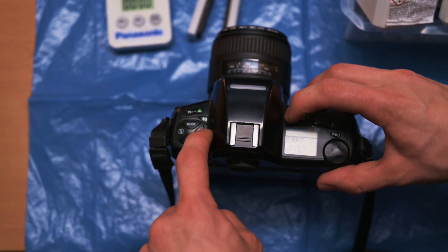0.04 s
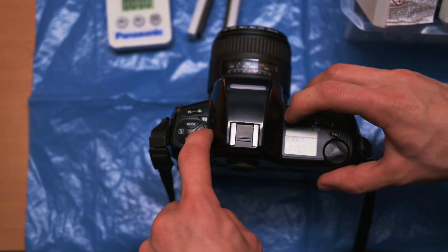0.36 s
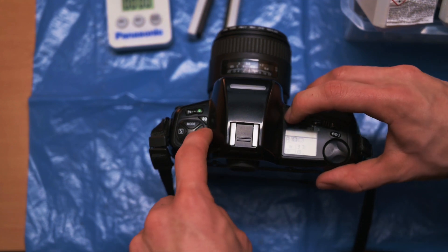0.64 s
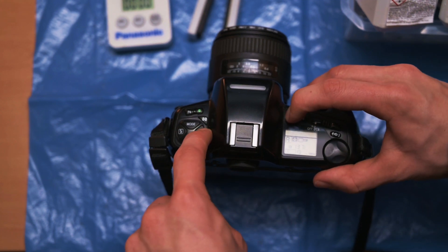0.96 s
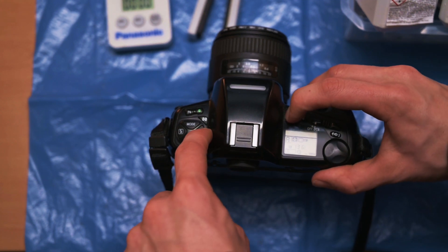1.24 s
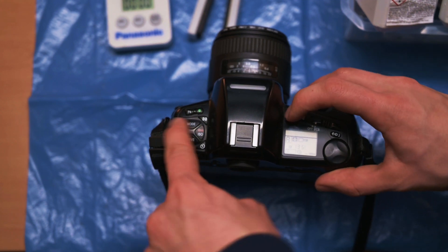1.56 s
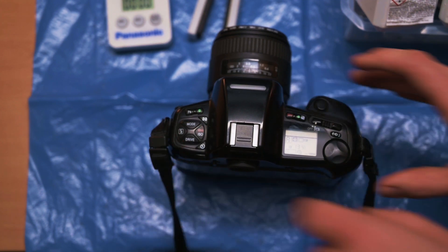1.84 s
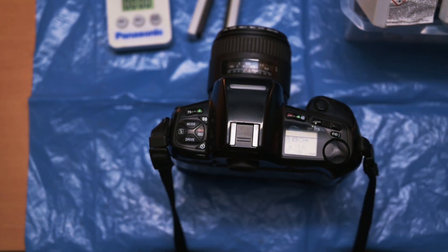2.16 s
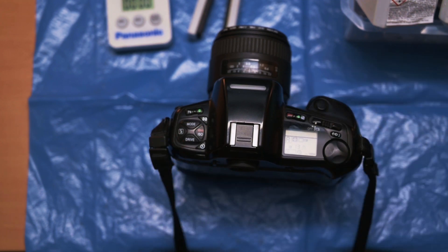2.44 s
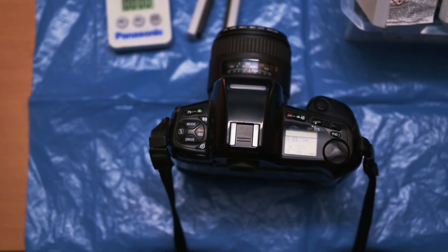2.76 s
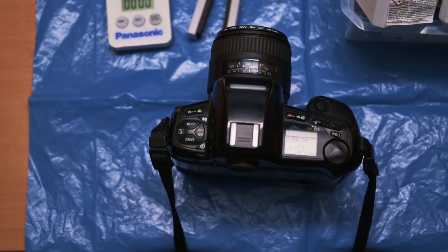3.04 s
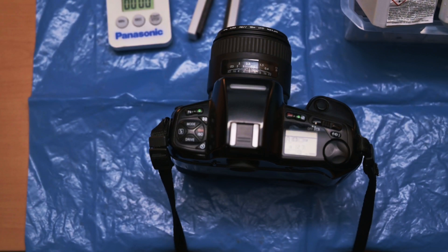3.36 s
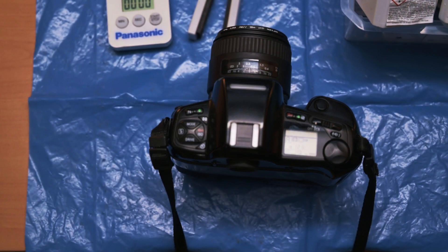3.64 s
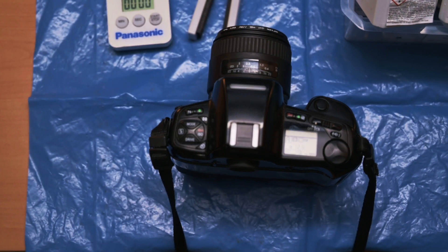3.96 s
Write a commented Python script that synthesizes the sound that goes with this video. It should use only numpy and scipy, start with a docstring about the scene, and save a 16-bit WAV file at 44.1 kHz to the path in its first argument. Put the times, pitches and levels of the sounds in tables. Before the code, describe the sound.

A small camera motor whirs steadily, rewinding film after a sharp button click.

```python
"""A quiet room, where a film camera on a table rewinds its film. A finger presses the button, the drive
clicks in, and a small motor runs at about 193 turns a second. Its pinion whines against a wheel; the
teeth rattle through the plastic body and now and then catch with a tick. The film hisses thinly as it
starts to move."""
import sys
import numpy as np
from scipy import signal
from scipy.fft import rfft, irfft, next_fast_len
from scipy.io import wavfile
from scipy.ndimage import map_coordinates

SR = 44100
rng = np.random.default_rng(int(sys.argv[2]) if len(sys.argv) > 2 else 0)


def wrap_up_sound(samples):
    """Save the sound to the file named by the first command line argument, as 16-bit audio."""
    columns = np.atleast_2d(samples).T
    # keep every value between -1 and 1, then stretch to whole-number steps
    tamed = np.clip(columns, -1, 1)
    steps = np.round(tamed * 32767).astype(np.int16)
    wavfile.write(sys.argv[1], SR, steps)


N = 176400
PINION_TEETH, WHEEL_TEETH = 16, 35


def amp(db):
    return 10 ** (np.asarray(db) / 20)


def unit(x):
    """Scale to rms 1."""
    return x / np.sqrt(np.mean(x ** 2) + 1e-20)


def curve(rows):
    """An automation line through (t/s, value) points."""
    return np.interp(np.arange(N) / SR, *np.transpose(rows))


def wobble(rate):
    """A smooth random curve, rate knots a second."""
    return map_coordinates(rng.standard_normal(N // 20), [np.arange(N) * rate / SR], mode="wrap")


def coloured(x, points):
    """Minimum-phase EQ of unit energy through (f/Hz, level/dB) points."""
    size = 2 * next_fast_len(N // 2 + SR // 10)
    hz, db = np.transpose(points)
    gain = amp(np.interp(np.log(np.fft.rfftfreq(size, 1 / SR) + 1), np.log(hz), db))
    cepstrum = irfft(np.log(unit(gain)))
    cepstrum[1:size // 2] *= 2
    cepstrum[size // 2 + 1:] = 0
    return irfft(rfft(x, size) * np.exp(rfft(cepstrum)), size)[:N]


def bursts(rows, decay_s):
    """A fast-dying burst of tiny contacts for each (t/s, level/dB) cue."""
    t = np.arange(N) / SR
    level = sum(amp(db) * (t >= s) * np.exp(-np.abs(t - s) / decay_s) for s, db in rows)
    return level * rng.standard_normal(N)


def partial(cycles, waver_db, waver_hz, drift_rad):
    """A sine of rms 1 whose level and phase waver."""
    phase = 2 * np.pi * (cycles + rng.random()) + drift_rad * wobble(waver_hz)
    return unit(np.sin(phase) * amp(waver_db * wobble(waver_hz)))


# Dark EQ of the room tone: f/Hz, level/dB
ROOM_EQ = [(15, -70), (25, -47), (82, -13.5), (140, -13.5), (188, -8.5), (246, -7), (340, -14), (703, -13),
           (1340, -19), (1660, -18.5), (2060, -24), (2230, -22.5), (2700, -26.5), (15500, -35.5)]
def room_tone(level_db=-55):
    """A quiet, steady rush under everything."""
    return amp(level_db) * coloured(rng.standard_normal(N), ROOM_EQ)


def reflections(x, wet_db=-9, t60_s=0.16):
    """The table and nearby things add a short tail to the direct sound."""
    t = np.arange(SR // 4) / SR
    tail = rng.standard_normal(len(t)) * amp(-60 * t / t60_s)
    return x + amp(wet_db) * signal.fftconvolve(x, tail / np.linalg.norm(tail))[:N]


# Swell and fade of the film hiss: t/s, level/dB
HISS_LEVEL = [(.94, -55), (1.25, -42), (1.42, -50), (1.5, -58), (2, -68)]
# Its airy peaks: f/Hz, level/dB
HISS_EQ = [(100, -50), (6000, -35), (7300, -20), (7750, 9), (8400, -23), (9900, -6), (11000, -22),
           (12750, -21), (13300, -13), (14100, 0), (14900, -14), (15600, -4)]
def film_hiss():
    """A thin hiss as the film starts to move."""
    return amp(curve(HISS_LEVEL)) * coloured(rng.standard_normal(N), HISS_EQ)


# The finger shifts on the body: t/s, level/dB
TOUCHES = [(.53, -56), (.787, -58)]
# The drive engages: t/s, level/dB
CLICKS = [(.9335, -38), (.9352, -44), (.9394, -23.5), (.9412, -27)]
# Crisp EQ of both: f/Hz, level/dB
BUTTON_EQ = [(100, -28), (1500, -14), (3000, -3), (4200, -4), (5500, -11), (8000, -9), (11000, -18),
             (15000, -15)]
def button():
    """Faint touches of the finger, then the click of the drive engaging."""
    return coloured(bursts(TOUCHES, decay_s=0.008) + bursts(CLICKS, decay_s=0.0027), BUTTON_EQ)


# Cues where the teeth catch: t/s, level/dB
TICKS = [(1.066, -25), (1.236, -38), (1.294, -22), (1.370, -22), (1.682, -22.5), (1.983, -25), (2.150, -24),
         (2.2245, -19.5), (2.385, -22), (2.70, -27), (3.003, -22), (3.324, -23), (3.646, -33), (3.737, -23),
         (3.785, -25), (3.944, -25)]
# Bright snap of a tick: f/Hz, level/dB
TICK_EQ = [(100, -46), (1500, -7.5), (3000, -3), (4200, 7.5), (5000, -12.5), (8500, -10), (10500, -16.5),
           (12000, -15), (15500, -29)]
def tooth_ticks():
    """Now and then the teeth catch with a sharp tick."""
    return coloured(bursts(TICKS, decay_s=0.0025), TICK_EQ)


# Rings of the casing: f/Hz, level/dB relative to the direct sound
CASE_MODES = [(786, 5), (1421, 3.5), (1558, 3.5), (1770, -12), (1910, -1), (2285, -6), (2770, -4),
              (2865, -7), (2968, -28), (3538, -12), (4129, -10)]
def casing(x, width_hz=18):
    """Narrow resonances ring on after whatever shakes the body."""
    f = np.fft.rfftfreq(2 * N, 1 / SR)
    ring = sum(amp(db) * f * width_hz / (hz * hz - f * f + 1j * f * width_hz) for hz, db in CASE_MODES)
    return irfft(rfft(x, 2 * N) * (1 + 1j * ring))[:N]


# Fader ride of the hum, before trim: t/s, level/dB
HUM_LEVEL = [(0.95, -56.5), (1.05, -51.5), (1.97, -47.5), (2.19, -48), (3.57, -47), (3.67, -59),
             (3.71, -45.5), (4.0, -50.5)]
def shaft_hum(motor, trim_db=0.5):
    """The shaft hums at one cycle per turn."""
    return amp(curve(HUM_LEVEL) + trim_db) * partial(motor, waver_db=0.6, waver_hz=8.2, drift_rad=0.03)


# Overtones of the motor's turn: harmonic number, level/dB
MOTOR_PARTIALS = [(4, -60), (8, -61.5), (9, -65), (13, -55.5), (17, -56), (20, -50), (21, -48.5), (31, -58),
                  (33, -53), (40, -59), (60, -59)]
# Overtones of the wheel's turn: harmonic number, level/dB
WHEEL_PARTIALS = [(16, -59.5), (43, -49.5), (44, -49), (47, -47.5), (48, -48), (49, -51), (68, -56),
                  (69, -45.5), (96, -52)]
def uneven_teeth(motor, wheel):
    """Uneven teeth add weak partials that swell as they cross the casing's rings."""
    tones = sum(amp(db) * partial(harmonic * shaft, waver_db=2.5, waver_hz=25, drift_rad=0.27)
                for shaft, rows in ((motor, MOTOR_PARTIALS), (wheel, WHEEL_PARTIALS))
                for harmonic, db in rows)
    return casing(tones)


# Plastic colour of the camera body: f/Hz, level/dB
BODY_EQ = [(50, -39), (150, -27.5), (290, -25), (380, -12.5), (600, -22), (1000, -16), (1480, -12.5),
           (1750, -15.5), (2350, -10), (2550, -14), (2950, -7.5), (3250, -5.5), (3550, -12), (3850, -5.5),
           (4260, -3), (4600, -17), (5300, -14), (5800, -15.5), (6200, -15), (6700, -16.5), (7800, -18.5),
           (8500, -16.5), (9000, -26), (10000, -26), (10800, -30.5), (11650, -19.5), (12400, -21.5),
           (13300, -26.5), (15700, -28.5)]
def gear_rattle(motor, wheel, strike_db=-34, scrape_db=-37, scatter_db=5, jitter_s=0.00015):
    """Each tooth strikes with its own force over a sliding scrape; both ring the body."""
    contacts = np.flatnonzero(np.diff(np.floor(PINION_TEETH * motor)))
    size, late, side = rng.standard_normal((N // 10, 3))[:len(contacts)].T
    onsets = np.clip(contacts + late * jitter_s * SR, 0, N - 1).astype(int)
    force = amp(scatter_db * np.minimum(size, 2.3))
    strikes = unit(np.bincount(onsets, force * np.sign(side), N))
    grit = amp(strike_db) * strikes + amp(scrape_db) * rng.standard_normal(N)
    # The load swells slightly with each gear's turn and surges at random.
    load_db = -0.05 * np.sin(2 * np.pi * motor) + 0.36 * np.sin(2 * np.pi * wheel) + 0.68 * wobble(110)
    return casing(coloured(grit * amp(load_db), BODY_EQ))


# Fader ride of the mesh tone, before trim and sway: t/s, level/dB
MESH_LEVEL = [(0.95, -39), (0.97, -36.5), (1.11, -32.5), (1.16, -39.5), (1.22, -30), (1.31, -45.5),
              (1.35, -33), (1.38, -53), (1.41, -35), (1.46, -48), (1.5, -34), (1.55, -46), (1.58, -38),
              (2.21, -36.5), (2.33, -39.5), (2.38, -33), (2.46, -41.5), (2.51, -38.5), (3.82, -35.5),
              (3.9, -43.5), (3.97, -35.5), (4.0, -37)]
# Fader ride of its octave: t/s, level/dB
OCTAVE_LEVEL = [(0.95, -61), (1.07, -39), (1.59, -40.5), (2.16, -36.5), (2.35, -42), (2.39, -35),
                (2.44, -38), (3.57, -37), (3.63, -44), (3.68, -36.5), (3.99, -37.5), (4.0, -40)]
def gear_whine(motor, wheel, trim_db=0.5, top_db=-55):
    """Meshing teeth sing a tone that sways with both gears, topped by two rougher octaves."""
    teeth = PINION_TEETH * motor
    sway = 1 + 0.18 * np.sin(2 * np.pi * wheel) + 0.2 * np.sin(2 * np.pi * motor)
    mesh = partial(teeth, waver_db=1.3, waver_hz=46, drift_rad=0.17) * sway
    octave = partial(2 * teeth, waver_db=1.8, waver_hz=110, drift_rad=0.38)
    top = partial(4 * teeth, waver_db=6.5, waver_hz=290, drift_rad=1.0)
    return amp(curve(MESH_LEVEL) + trim_db) * mesh + amp(curve(OCTAVE_LEVEL)) * octave + amp(top_db) * top


# Turning rate of the motor: t/s, f/Hz
MOTOR_SPEED = [(0.94, 187.0), (1.03, 191.2), (1.17, 196.7), (1.23, 194.9), (1.32, 198.1), (1.56, 196.4),
               (1.63, 193.3), (1.68, 195.3), (1.73, 192.6), (1.82, 196.2), (1.87, 192.3), (1.93, 195.5),
               (2.32, 190.5), (2.4, 193.4), (2.47, 197.4), (2.53, 193.6), (2.66, 191.6), (2.69, 195.0),
               (2.75, 195.3), (2.81, 191.5), (2.87, 193.5), (3.0, 194.5), (3.07, 190.3), (3.13, 194.3),
               (3.19, 192.5), (3.27, 194.9), (3.44, 191.9), (3.53, 194.3), (3.65, 188.7), (3.71, 193.6),
               (3.78, 194.9), (3.88, 188.7), (3.96, 192.5), (4, 191.5)]
def rewind_drive(start_s=0.938, attack_s=0.015, flutter_depth=0.0035, flutter_hz=45):
    """The motor's speed sets the pitch of every partial and the pace of the rattle."""
    speed = curve(MOTOR_SPEED) * (1 + flutter_depth * wobble(flutter_hz))
    motor = np.cumsum(speed) / SR  # angle in turns
    wheel = motor * PINION_TEETH / WHEEL_TEETH
    hiss = film_hiss()
    tones = shaft_hum(motor) + gear_whine(motor, wheel) + uneven_teeth(motor, wheel)
    clatter = gear_rattle(motor, wheel) + tooth_ticks()
    fade_in = np.clip((np.arange(N) / SR - start_s) / attack_s, 0, 1)
    return fade_in * (tones + reflections(clatter + hiss))


def scene():
    """The camera close up over room tone, in mono."""
    return (room_tone() + rewind_drive() + button())[None]


def record(dry):
    """A brick-wall high cut on the mix."""
    cutoff_hz = 15780
    return irfft(rfft(dry) * (np.fft.rfftfreq(N, 1 / SR) < cutoff_hz), N)


dry = scene()
out = record(dry)
wrap_up_sound(out)
```